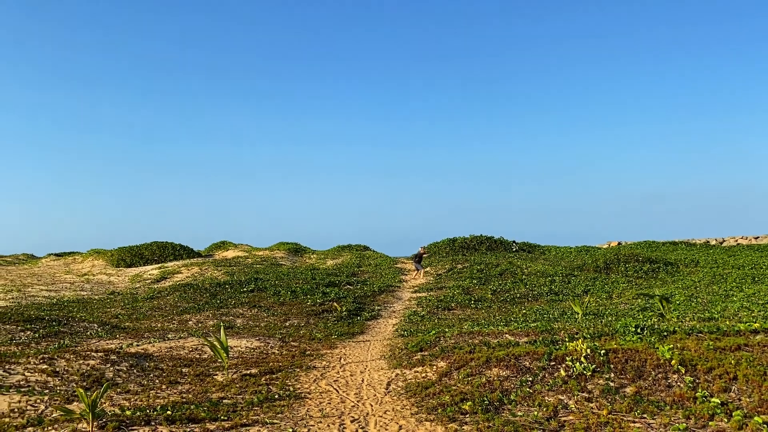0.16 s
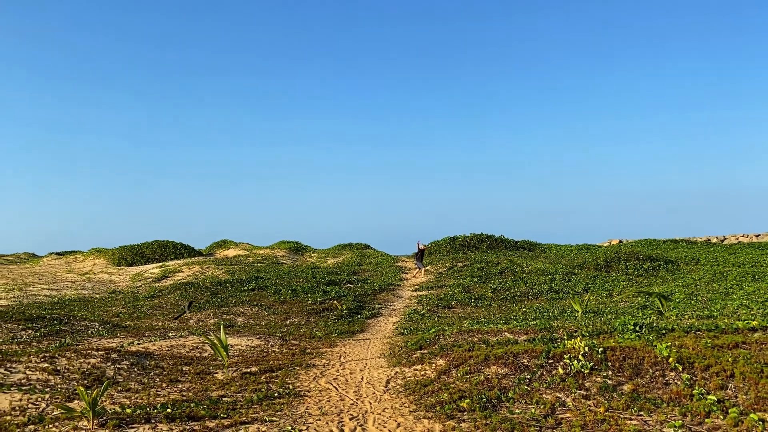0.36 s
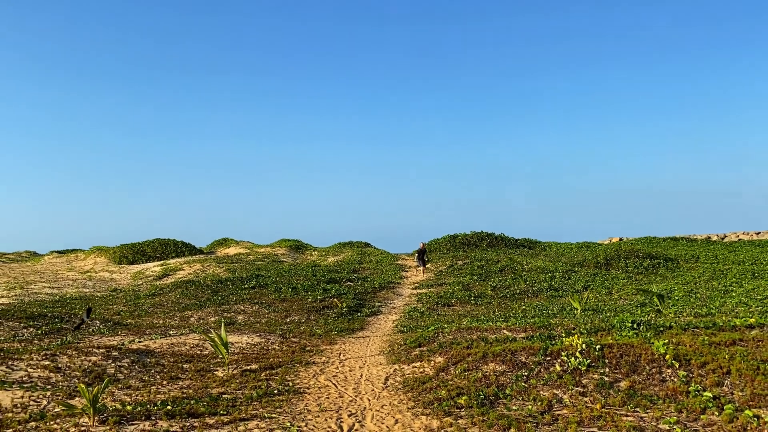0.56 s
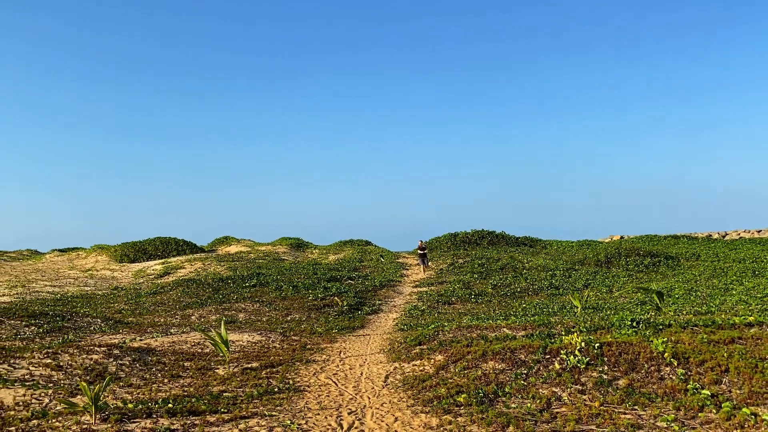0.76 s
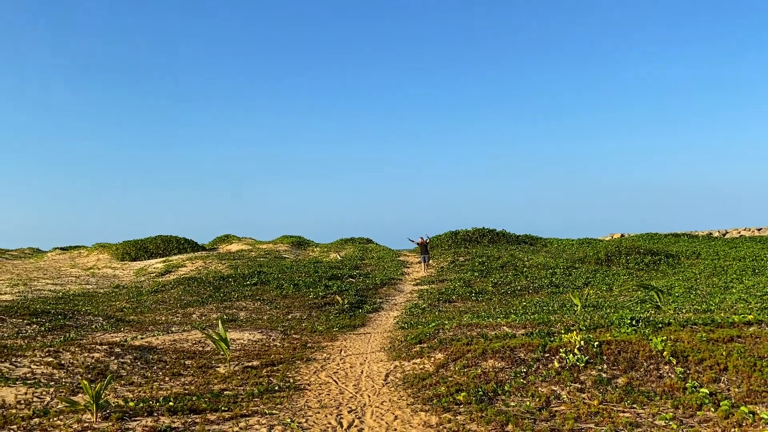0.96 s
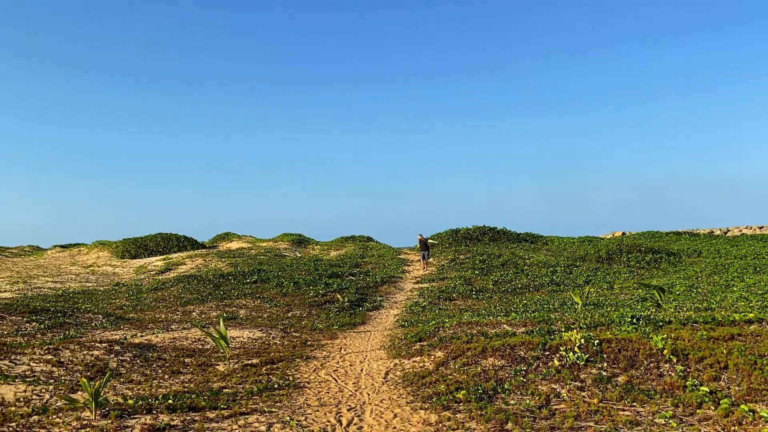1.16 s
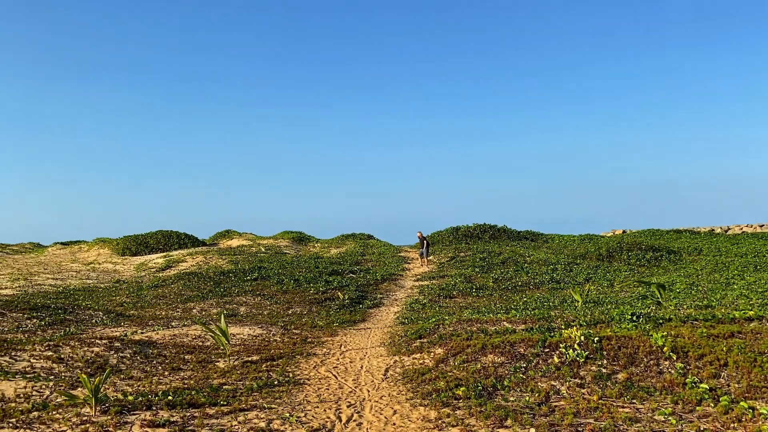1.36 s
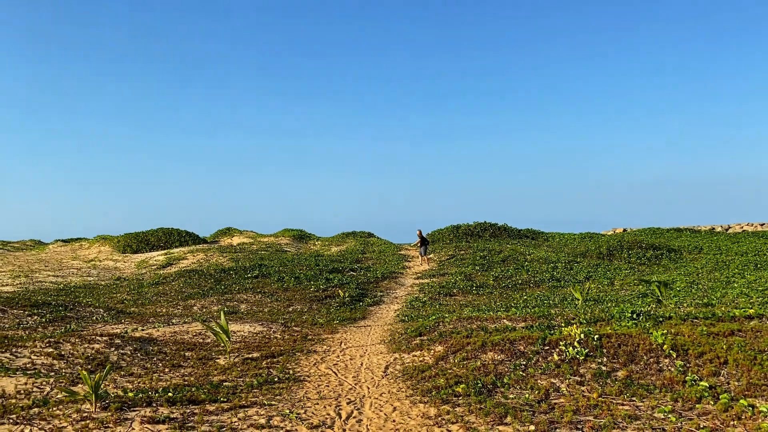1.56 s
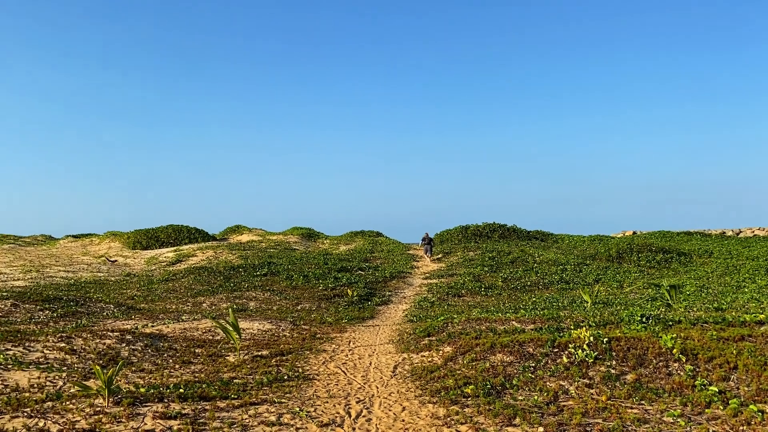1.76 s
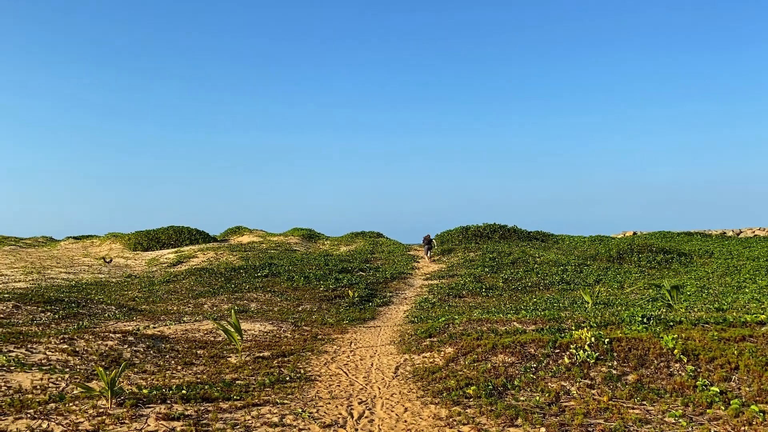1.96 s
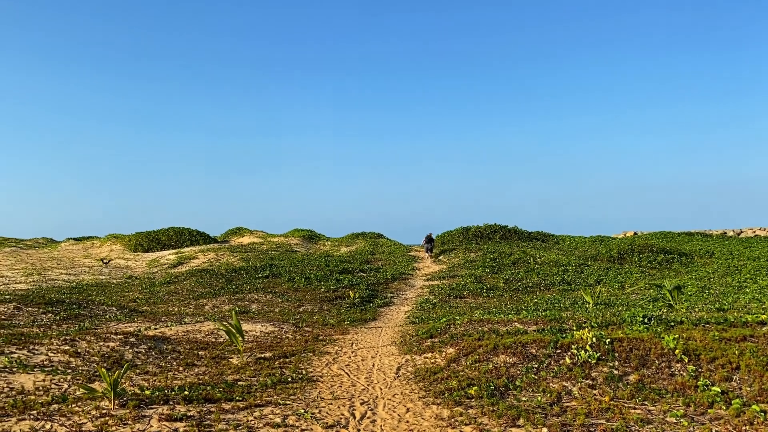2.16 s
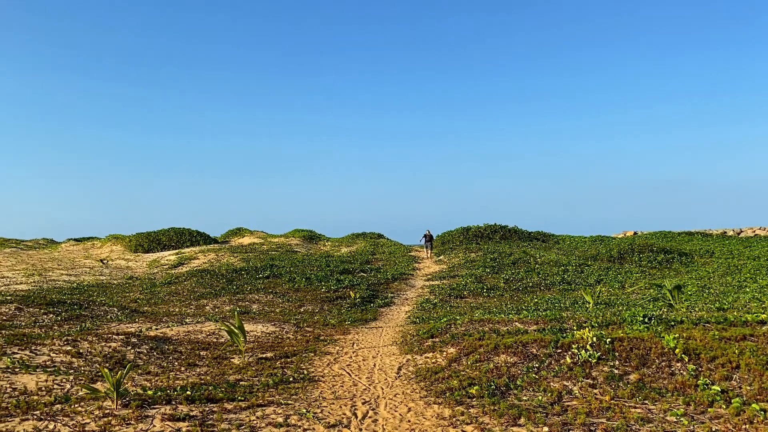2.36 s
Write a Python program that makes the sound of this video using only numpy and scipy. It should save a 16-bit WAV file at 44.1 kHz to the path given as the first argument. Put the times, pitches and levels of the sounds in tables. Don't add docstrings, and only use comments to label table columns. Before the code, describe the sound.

A shorebird's reedy, falling alarm cry, faint distant bird calls, and wind rumble rising at the end

```python
import sys
import numpy as np
from scipy import signal
from scipy.fft import rfft, irfft
from scipy.io import wavfile
from scipy.ndimage import uniform_filter1d

SR = 44100
rng = np.random.default_rng(int(sys.argv[2]) if len(sys.argv) > 2 else 0)


def decibels_to_gain(level_db):
    exponent = np.asarray(level_db, float) / 20
    return 10 ** exponent


def master(y):
    cut = np.clip(np.atleast_2d(y).T, -1, 1)
    pcm = np.round(cut * 32767)
    wavfile.write(sys.argv[1], SR, pcm.astype(np.int16))


N = 110250


def read(points, hz):
    f, v = np.transpose(points)
    return np.interp(np.log(hz + 1), np.log(f + 1), v)


def evened(x):
    return x / np.sqrt(np.mean(x ** 2) + 1e-20)


def add(mix, s, sound):
    part = mix[round(s * SR):][:len(sound)]
    part += sound[:len(part)]


def progress(length_s):
    return np.linspace(0, 1, round(length_s * SR))


def coloured(points, count=N):
    hz = np.fft.rfftfreq(count, 1 / SR)
    inside = (hz >= points[0][0]) & (hz <= points[-1][0])
    spectrum = rfft(rng.standard_normal(count)) * decibels_to_gain(read(points, hz)) * inside
    return evened(irfft(spectrum, count))


def drift(count, hz):
    x = rng.standard_normal(count + 4000)
    size = max(int(SR / hz / 2), 1)
    smooth = uniform_filter1d(uniform_filter1d(x, size), size)
    return evened(smooth[2000:2000 + count])


def fuzzy(hz, width_hz, clear=0):
    r = np.exp(-np.pi * width_hz / SR)
    count = len(hz) + 3000
    z = rng.standard_normal(count) + 1j * rng.standard_normal(count)
    for _ in range(2):
        z = signal.lfilter([1], [1, -r], z)
    z = z[3000:]
    z = clear + (1 - clear) * z / np.sqrt(np.mean(abs(z) ** 2))
    carrier = np.exp(2j * np.pi * np.cumsum(hz) / SR)
    return evened((z * carrier).real)


# [f/Hz, level/dB]
THROAT = [(800, -26.5), (1170, -13), (2300, -10.5), (4700, -7), (7080, -14.5), (8100, -33.5), (10700, -22),
          (13000, -42)]


def voice(hz, beak_hz, tilt_db, rough):
    count = len(hz)
    pulse_jitter = 0.35 * rough ** 2 * drift(count, 160)
    turns = np.cumsum(hz) / SR + pulse_jitter / (2 * np.pi)
    out, power = 0, 0
    for k in range(1, 13):
        partial_hz = k * hz
        breath = decibels_to_gain(np.minimum(-20 + 0.5 * k + 5 * rough, 4))
        shimmer = np.sqrt(2) * decibels_to_gain(2 * drift(count, 68))
        phase_sway = 0.35 * drift(count, 23.5)
        tone = shimmer * np.cos(2 * np.pi * k * turns + phase_sway)
        beak_db = 11.5 * np.exp(-((partial_hz - beak_hz) / 840) ** 2)
        dull_db = tilt_db * np.minimum(partial_hz, 6500) / 1000
        gain = decibels_to_gain(read(THROAT, partial_hz) + dull_db + beak_db)
        out = out + gain * (tone + breath * fuzzy(partial_hz, 300))
        power = power + gain ** 2 * (1 + breath ** 2)
    return out / np.sqrt(power)


def second_voice(t, pitch):
    start_s, end_s = 0.2314, 0.29
    modulation = 1 + 0.31 * np.cos(2 * np.pi * np.cumsum(pitch) / SR)
    swell = np.sin(np.pi * np.clip((t - start_s) / (end_s - start_s), 0, 1)) ** 0.5
    return decibels_to_gain(-55.5) * np.cos(2 * np.pi * 943 * t) * modulation * swell


# [t/s, pitch f/Hz, effort level/dB]
CALLS_NEAR = [
    [(.241, 1032, -56), (.2445, 1108, -47.5), (.258, 1174, -43), (.274, 1182, -42), (.303, 1153, -42.5),
     (.341, 1111, -44), (.349, 1056, -45.5), (.378, 958, -50), (.421, 801, -59)],
    [(2.097, 943, -61), (2.105, 888, -62), (2.115, 1044, -45.5), (2.125, 1029, -49.5), (2.133, 947, -49),
     (2.156, 840, -60.5), (2.17, 810, -76)],
    [(2.481, 905, -66), (2.486, 994, -47.5), (2.4895, 1125, -47.5), (2.5, 1214, -39.5)],
]
# [resonance f/Hz, brightness/dB per kHz]
BEAKS = [(3500, 0.0), (3050, -0.4), (2400, -0.5)]


def long_calls():
    out = np.zeros(N)
    for number, (rows, (beak_hz, tilt_db)) in enumerate(zip(CALLS_NEAR, BEAKS)):
        s, hz, db = np.transpose(rows)
        t = np.arange(s[0], s[-1], 1 / SR)
        pitch = uniform_filter1d(np.interp(t, s, hz), 150, mode="nearest")
        effort_db = np.interp(t, s, db)
        tiring = t > s[db.argmax()]
        dulling = 0.6 * (effort_db - db.max()) * tiring
        rough = ((t - s[0]) / 0.23) ** 2
        call = voice(pitch, beak_hz, tilt_db + dulling, rough) * decibels_to_gain(effort_db)
        if number == 0:
            call = call + second_voice(t, pitch)
        add(out, s[0], call)
    return out


# [t/s, partials as [f/Hz, level/dB]]
CHIPS = [
    (0.1087, [(1930, -72), (2880, -56.5), (4070, -67.5)]),
    (0.175, [(2070, -57.5), (3050, -47), (4110, -50.5), (5150, -70), (6200, -64), (7150, -60.5), (10300, -77)]),
]


def chips():
    out = np.zeros(N)
    t = np.arange(1200) / SR
    rise_s, fall_s = 0.0014, 0.0035
    shape = np.minimum(t / rise_s, 1) * np.exp(-(t / fall_s) ** 2 / 2)
    for s, partials in CHIPS:
        for hz, db in partials:
            add(out, s, shape * decibels_to_gain(db) * np.sin(2 * np.pi * (hz * t + rng.random())))
    return out


# [delay t/s, level/dB]
ECHOES = [
    (.009, -16),
    (.021, -19.5),
    (0.033, -25),
]


def dune_echo(birds):
    t = np.arange(SR // 2) / SR
    decay_s = 0.16
    space = rng.standard_normal(len(t)) * decibels_to_gain(-60 * t / decay_s) * (t > 0.004)
    space *= decibels_to_gain(-18) / np.linalg.norm(space)
    space[0] = 1
    for s, db in ECHOES:
        space[round(s * SR)] += decibels_to_gain(db)
    return signal.fftconvolve(birds, space)[:N]


# [start t/s, length t/s, start f/Hz, middle f/Hz, end f/Hz]
WHISTLES = [(.5, .14, 2300, 2180, 2150), (.645, .1, 2170, 2200, 1960), (.615, .12, 1880, 1880, 1890),
            (.72, .085, 1900, 1950, 1860), (.735, .06, 1980, 2060, 2230), (.79, .045, 2010, 2090, 2220),
            (.875, .1, 1760, 1820, 1940), (.97, .125, 1920, 1930, 1910), (1.11, .14, 1890, 1980, 1860),
            (.455, .12, 3340, 3310, 3260), (2.035, .12, 1290, 1240, 1130), (2.042, .03, 2090, 2090, 2090),
            (1.47, .33, 4120, 4130, 4190), (.83, .08, 1580, 1540, 1560), (.745, .05, 1600, 1610, 1680)]
WHISTLE_DB = [-74.5, -63, -67, -64.5, -78, -75, -70.5, -74.5, -80, -83.5, -55.5, -64.5, -93.5, -68.5, -68]
WHISTLE_BLUR_HZ = [90, 40, 40, 40, 40, 60, 80, 70, 110, 60, 160, 60, 200, 120, 90]


def far_whistles():
    out = np.zeros(N)
    for (s, length, *hz), db, blur_hz in zip(WHISTLES, WHISTLE_DB, WHISTLE_BLUR_HZ):
        u = progress(length)
        glide = uniform_filter1d(np.interp(u, [0, 0.5, 1], hz), len(u) // 4, mode="nearest")
        shape = np.sin(np.pi * u) ** 0.5 * decibels_to_gain(0.99 * drift(len(u), 30))
        pitch = glide * (1 + 0.006 * drift(len(u), 22))
        clear = 0.55 * min(1, 55 / blur_hz)
        add(out, s, decibels_to_gain(db) * shape * fuzzy(pitch, blur_hz, clear))
    return out


# [start t/s, length t/s, f/Hz, width f/Hz]
CHATTER = [(.49, .44, 1560, 380), (.5, .43, 2100, 360), (.6, .4, 5340, 400), (.92, .2, 5400, 400),
           (1.17, .38, 890, 240), (.235, .21, 690, 420), (1.432, .028, 2400, 250), (1.33, .08, 2000, 400),
           (.42, .22, 5660, 220), (.9, .2, 1800, 600), (.45, .34, 11900, 600), (1.08, .18, 5250, 400),
           (1.432, .028, 3300, 300), (1.33, .18, 2600, 450), (1.08, .18, 1900, 500), (1.79, .1, 4000, 700)]
CHATTER_DB = [-68.5, -68, -80.5, -86.5, -73.5, -66, -79.5, -81.5, -86.5, -74, -102.5, -97.5, -88, -89.5,
              -79, -75]


def far_chatter():
    out = np.zeros(N)
    for (s, length, hz, width_hz), db in zip(CHATTER, CHATTER_DB):
        u = progress(length)
        level = decibels_to_gain(db + 2.35 * drift(len(u), 10))
        add(out, s, level * np.sin(np.pi * u) * fuzzy(hz + 0 * u, width_hz))
    return out


# [t/s, level/dB]
WIND = [(0, -80.5), (0.049, -67), (0.171, -66), (.22, -78), (.39, -66.5), (.475, -79.5), (.54, -63.5),
        (.93, -69.5), (1.15, -64), (1.27, -65.5), (1.45, -63.5), (1.701, -63), (1.806, -57), (1.885, -48.5),
        (2.119, -43.5), (2.21, -48.5), (2.32, -45.5), (2.5, -39.5)]
# [f/Hz, level/dB]
WIND_COLOUR = [(25, -26), (56, 3.5), (80, 7.5), (248, -7.5), (718, -22), (1220, -24), (1600, -68)]
# [f/Hz, level/dB]
CALM_COLOUR = [(25, -34), (60, -7.5), (189, -1.5), (356, -10), (484, -21), (882, -26), (1600, -41.5)]


def wind_rumble():
    t = np.arange(N) / SR
    s, db = np.transpose(WIND)
    gust = np.clip((t - 1.8) / 0.014, 0, 1)
    rumble = (1 - gust) * coloured(CALM_COLOUR) + gust * coloured(WIND_COLOUR)
    return rumble * decibels_to_gain(np.interp(t, s, db) + 2.2 * drift(N, 30))


# [start t/s, length t/s, f/Hz]
HEAVES = [(.59, .12, 70), (.24, .2, 65), (1.38, .11, 70), (1.085, .06, 70), (1.17, .055, 70),
          (2.31, .1, 70), (0, .1, 60), (1.795, .06, 180), (.44, .08, 90), (.95, .07, 80), (.18, .04, 80)]
HEAVE_DB = [-54.5, -62.5, -63.5, -64.5, -68, -37, -64, -52, -70.5, -67.5, -66]


def wind_heaves():
    out = np.zeros(N)
    for (s, length, hz), db in zip(HEAVES, HEAVE_DB):
        u = progress(length)
        add(out, s, decibels_to_gain(db) * np.sin(np.pi * u) * fuzzy(hz + 0 * u, 72, clear=0.55))
    return out


# [t/s, level/dB, f/Hz]
BUFFETS = [(0.044, -53, 105), (0.075, -53, 105), (0.123, -50.5, 71), (0.149, -51.5, 120), (0.66, -51, 129),
           (0.749, -55, 89), (0.8, -58.5, 88), (1.884, -47, 95), (1.923, -45.5, 69), (1.964, -36.5, 163),
           (2.013, -31.5, 131), (2.038, -29, 191), (2.053, -25.5, 153.3), (2.148, -37, 113.4),
           (2.254, -31, 99), (2.309, -34, 200), (2.324, -31.5, 71.5), (2.36, -36, 69), (2.426, -29, 240),
           (2.44, -27.5, 59.7), (2.454, -27, 97.4)]


def wind_buffets():
    out = np.zeros(N)
    grit = coloured([(60, -3), (200, 1), (400, -1), (560, -12), (900, -30)])
    cycles = 2.8
    for s, db, hz in BUFFETS:
        u = np.arange(0, cycles, hz / SR)
        shape = np.sin(np.pi * (u / cycles) ** 0.54) ** 2
        grit_share = 0.46 * min(1, decibels_to_gain((db + 39.5) / 2))
        rasp = grit_share * np.roll(grit, -round(s * SR))[:len(u)]
        add(out, s - 0.001, decibels_to_gain(db) * shape * (np.sin(2 * np.pi * u) + rasp))
    return out


# [t/s, low hiss level/dB, high hiss level/dB]
GATE = [(0, -88, -107), (.14, -80.5, -105), (.18, -73, -91), (0.217, -77, -101), (0.244, -65, -87),
        (0.402, -65, -73), (0.471, -72.5, -99), (.6, -74, -94.5), (.9, -73.5, -104), (.95, -79.5, -112),
        (1.77, -77.5, -112), (1.786, -80.5, -106), (1.804, -64, -95), (2.02, -63.5, -96), (2.04, -59, -85),
        (2.15, -58, -78), (2.46, -55, -81.5), (2.5, -55.5, -87)]
# [f/Hz, level/dB]
HISS_CALM = [(400, -15.5), (600, -5), (1330, -9), (1540, -12.5), (2800, -19.5), (4070, -23.5), (6000, -31),
             (9500, -47.5)]
# [f/Hz, level/dB]
HISS_LOW = [(400, -15), (600, -3.5), (1330, -10.5), (1540, -15), (4070, -19.5), (6000, -33), (9500, -58.5)]
# [f/Hz, level/dB]
HISS_HIGH = [(5000, -1.5), (7800, 8.5), (10300, -2.5), (12900, -4.5)]


def gated_hiss():
    t = np.arange(N) / SR
    s, low_db, high_db = np.transpose(GATE)
    low = np.where(t < 1.79, coloured(HISS_CALM), coloured(HISS_LOW))
    low = low * decibels_to_gain(np.interp(t, s, low_db) + 0.48 * drift(N, 25))
    high = coloured(HISS_HIGH) * decibels_to_gain(np.interp(t, s, high_db) + 0.82 * drift(N, 28))
    return low + high


# [t/s, f/Hz, level/dB]
TICKS = [
    (2.036, 7800, -63),
    (2.088, 10700, -59.5),
]


def ticks():
    out = np.zeros(N)
    t = np.arange(200) / SR
    for s, hz, db in TICKS:
        add(out, s, decibels_to_gain(db) * np.exp(-t / 0.0009) * fuzzy(hz + 0 * t, hz / 12))
    return out


# [start t/s, length t/s, lowest f/Hz]
PATCHES = [(.243, .16, 13700), (.4, .025, 15000), (2.07, .19, 13800), (2.26, .082, 14200),
           (2.38, .027, 14900), (2.455, .02, 15200), (2.475, .025, 13000)]
PATCH_DB = [-79, -91, -82, -88, -92, -88, -84]


def top_patches():
    out = np.zeros(N)
    for (s, length, hz), db in zip(PATCHES, PATCH_DB):
        size = round(length * SR)
        band = coloured([(hz, 0), (15700, 0)], count=size)
        add(out, s, decibels_to_gain(db) * signal.windows.tukey(size, 0.15) * band)
    return out


def scene():
    near = dune_echo(long_calls() + chips())
    far = far_whistles() + far_chatter()
    wind = wind_rumble() + wind_heaves() + wind_buffets()
    hiss = gated_hiss() + ticks() + top_patches()
    return (near + far + wind + hiss)[None]


# [f/Hz, level/dB]
MIC = [(25, -41), (38, -19.5), (50, -0.5), (8500, 1), (9050, -19.5), (9500, 4), (12700, 5), (13200, -29),
       (13900, -3.5)]


def microphone(dry):
    hz = np.fft.rfftfreq(2 * N, 1 / SR)
    heard = irfft(rfft(dry, 2 * N) * decibels_to_gain(read(MIC, hz)))[:, :N]
    return heard + decibels_to_gain(-100) * coloured([(300, -12), (8000, -8), (9800, -4.5)])


def low_pass(x):
    return signal.sosfilt(signal.butter(12, 15760, fs=SR, output="sos"), x)


def record(dry):
    mix = microphone(dry)
    return low_pass(mix)


dry = scene()
out = record(dry)
master(out)
```